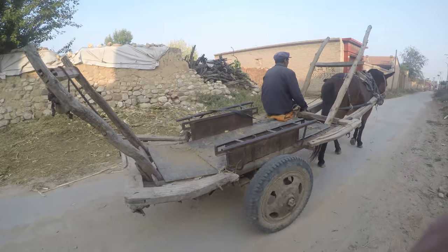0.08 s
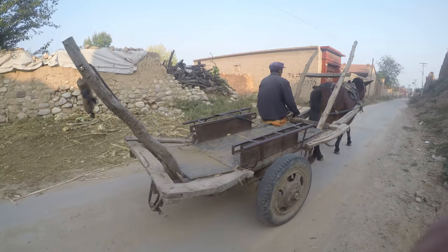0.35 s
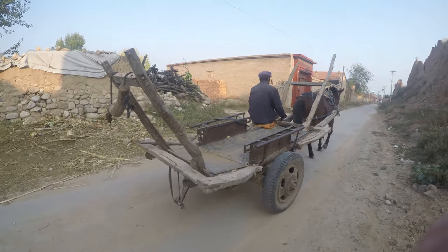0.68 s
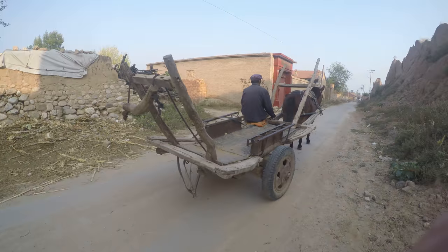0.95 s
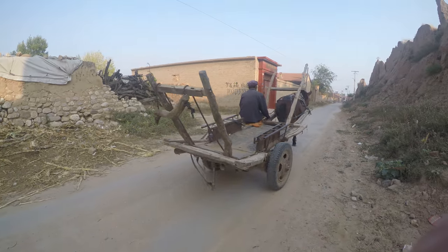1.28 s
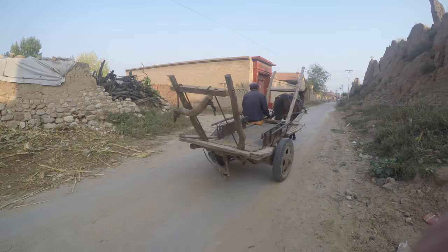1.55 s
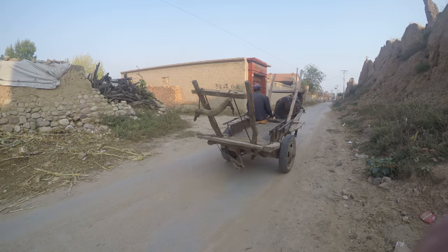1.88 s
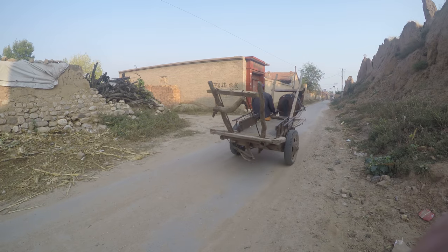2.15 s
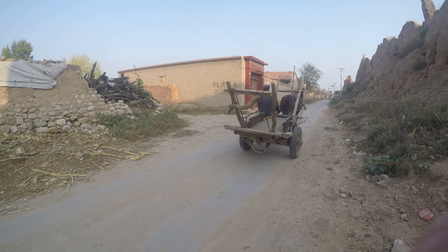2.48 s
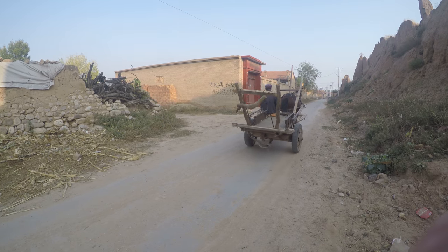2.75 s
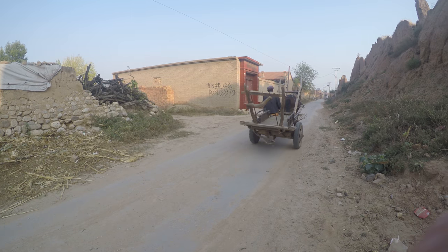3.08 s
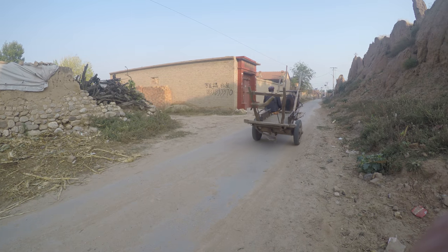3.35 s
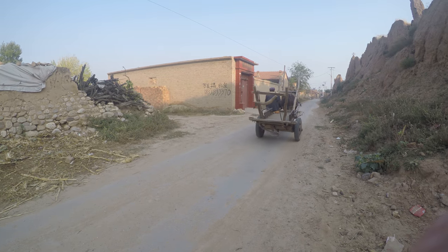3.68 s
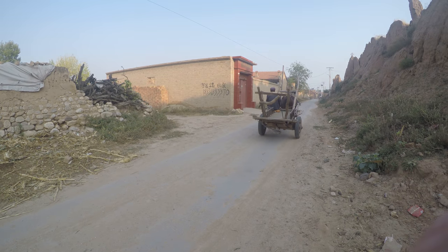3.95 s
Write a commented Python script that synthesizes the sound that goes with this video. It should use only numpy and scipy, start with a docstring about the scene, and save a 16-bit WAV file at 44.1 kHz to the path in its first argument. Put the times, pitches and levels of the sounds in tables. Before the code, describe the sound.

A horse-drawn wooden cart rattles away over a gritty road as sparrows chirp.

```python
"""A horse-drawn wooden cart moves away from the microphone down a dusty village road.
Its boards and fittings knock and ring, its frame groans as timber slips on timber,
the tyres crunch over grit and pebbles, and the hooves thud softly in the dust.
Sparrows chirp near and far, echoing between the walls. Behind them lie the village's hush
and a faint high whine; a light wind rumbles on the microphone."""
import sys
import numpy as np
from scipy import signal
from scipy.fft import rfft, irfft
from scipy.io import wavfile
from scipy.ndimage import uniform_filter1d

SR = 44100
rng = np.random.default_rng(int(sys.argv[2]) if len(sys.argv) > 2 else 0)


def pcm_store(signal):
    """Save signal as 16-bit PCM."""
    levels = np.round(np.clip(np.atleast_2d(signal), -1, 1) * 32767)
    wavfile.write(sys.argv[1], SR, levels.astype(np.int16).T)


N = 176400
T = np.arange(N) / SR

# knocks of boards and fittings: (time [s], relative level [dB], bass offset [dB], middle offset [dB],
# brightest pitch [Hz], crumble time [s])
KNOCKS = [(0.019,-40.5,-18,-9.5,3620,0.0025), (0.0476,-46.5,-7,-6,4660,0.007),
          (0.059,-42,-14,-6,4580,0.0023), (.120,-45.5,-34,-7.5,3630,0.0025),
          (0.149,-46,-11,-13,4680,0.0081), (.241,-43.5,-11,-10.5,4540,0.0075),
          (0.296,-45.5,-13,-28,5130,0.0093), (0.3459,-25.5,-41,-36,4350,0.00066),
          (0.3504,-31.5,-32,-15,4100,0.0011), (.637,-34.5,-13.5,-9.5,3300,0.0012),
          (.6467,-48,-2,-3,3300,0.0018), (0.8097,-44,-36,-13.5,3250,0.011),
          (0.996,-51.5,-22,-21,5000,0.013), (1.3368,-41.5,-13,-18,4600,0.0029),
          (1.480,-44,-7.5,-7.5,3600,0.0057), (1.669,-30.5,-8.5,-10.5,3500,0.0017),
          (1.6806,-34,-16,-9.5,4870,0.0023), (1.6839,-34.5,-10,-13,4400,0.001),
          (1.693,-45,-12,-17,3200,0.0029), (1.7816,-42,-21,-23,4300,0.0096),
          (1.8638,-45.5,-6,-11,3640,0.011), (2.6418,-54.5,-4,4,3550,0.0038),
          (2.776,-46.5,-25,-3.5,3380,0.0034), (3.041,-47.5,-16,-7.5,4400,0.0073),
          (3.2155,-51,-12,-2,4200,0.0058), (3.228,-51,-10,-3,3400,0.012), (3.5906,-44.5,-19,-8,3650,0.0028)]
# three groups of modes that a knock rings: (pitch [Hz], relative level [dB], t60 [s])
BASS_MODES = [(627, -6.5, 0.0081), (974, 4, 0.022), (1193, 2, 0.02), (1430, 2, 0.03)]
MIDDLE_MODES = [(2250, 0.41, 0.017), (2724, -1.5, 0.016)]
TREBLE_MODES = [(3300, 6, 0.012), (3750, 8, 0.004), (4200, 8.5, 0.0089), (4880, 8, 0.0055),
                (5120, 5.5, 0.011), (6290, 3.5, 0.0076)]
# snaps of grit and metal fittings: (time [s], relative level [dB])
SNAPS = [(.148, -48.5), (.297, -50), (0.3442, -37), (0.35, -42.5), (0.361, -54), (.81, -52), (1.48, -50.5),
         (1.67, -45), (1.682, -46)]
# groans of the frame: (time [s], length [s], centre pitch [Hz], level [dB], roughness [ratio])
CREAKS = [(0.161, .17, 311.2, -57, 0.89), (0.183, 0.118, 505.5, -69, 1.01),
          (0.348, 0.1004, 330.4, -59, 0.61), (0.714, 0.061, 351.7, -62, 0.6), (0.969, 0.058, 362, -58, 0.3)]
# tyres on grit, going away: (time [s], level [dB])
GRIT_LEVEL = [(0, -61.5), (.35, -61), (.7, -63.5), (1.1, -65.5), (2, -65.5), (3, -66.5), (4, -67)]
# spectrum of that grit: (frequency [Hz], relative level [dB])
GRIT_SPECTRUM = [(150, 6), (350, 4.5), (600, -1.5), (1100, -2), (1700, -9), (2400, -6.5), (4000, -6.5),
                 (6000, -8), (7500, -20.5), (15000, -40)]
# rumble of the cart's bed: (time [s], level [dB])
BED_LEVEL = [(0, -65.5), (.4, -66.5), (.8, -74.5), (4, -70.5)]
# pebbles pinched under the tyres: (time [s], peak before echoes [dB], pitch [Hz])
PEBBLES = [(.280, -50, 4110), (.3237, -42.5, 4120), (.366, -45, 4200), (.395, -58, 4000),
           (.4207, -44.5, 4200), (.5372, -49, 4230), (.563, -55, 4080), (.6125, -51, 2740),
           (.7427, -51, 4050), (.7751, -45.5, 4060), (.8824, -43, 3920), (1.095, -54.5, 5270),
           (1.222, -49.5, 3200), (1.278, -42.5, 3470), (1.575, -49, 4300), (1.627, -50, 3910),
           (1.758, -46, 3300), (2.073, -51.5, 3200), (2.215, -49, 4500), (3.674, -52, 3400)]
# hooves on packed earth: (time [s], peak before echoes [dB], pitch [Hz])
HOOVES = [(1.376, -55, 990), (1.585, -57, 1040), (1.932, -53, 1050), (2.473, -50.5, 1030),
          (2.558, -57.5, 950), (2.684, -55, 1100), (3.559, -55.5, 1070), (3.77, -56, 1200),
          (3.783, -52.5, 1070)]
# near sparrows: (time [s], length [s], start pitch [Hz], end pitch [Hz], relative level [dB])
CHIRPS = [(.455, 0.068, 5400, 3400, -55), (.655, 0.029, 4100, 5200, -54), (.72, 0.041, 5440, 3900, -52.5),
          (.825, 0.04, 5530, 3700, -53.5), (.875, 0.0282, 3700, 4200, -52), (.905, 0.04, 4200, 5300, -59),
          (1.235, 0.053, 6100, 4200, -53.5), (1.283, 0.021, 3900, 4030, -43.5),
          (1.41, 0.039, 4600, 4000, -56.5), (1.81, 0.055, 5000, 5950, -59),
          (1.89, 0.038, 3800, 3400, -54.5), (1.928, 0.063, 5500, 3300, -47),
          (1.992, 0.027, 3350, 3600, -50.5), (2.015, 0.021, 5700, 4200, -50),
          (2.135, 0.038, 4900, 4000, -59.5), (2.255, 0.067, 5300, 3200, -50.5),
          (2.33, 0.044, 5600, 3850, -51.5), (2.38, 0.033, 3950, 3750, -53.5),
          (2.425, 0.035, 4300, 3750, -58), (2.432, 0.02, 5200, 5900, -56.5),
          (2.465, 0.056, 5500, 3200, -53), (2.695, 0.024, 5500, 3700, -57.5),
          (2.845, 0.068, 3890, 4500, -60), (2.9, 0.038, 5000, 5900, -61), (3.02, 0.04, 4900, 3895, -54.5),
          (3.05, 0.047, 3850, 3135, -53), (3.32, 0.1, 5380, 3575, -57.5), (3.522, 0.062, 5900, 3750, -53)]
# swell of the farther flock: (time [s], gain [dB])
FLOCK_SWELL = [(0, 2.5), (1.3, -10), (1.9, 3), (2.4, 2.5), (2.7, -4), (4, -5)]
# peeps of a distant bird: (time [s], level [dB])
PEEPS = [(2.36, -65), (3.07, -70.5), (3.21, -64), (3.27, -72), (3.607, -68), (3.66, -64)]
# eddies striking the microphone: (time [s], level [dB], frequency [Hz])
BUFFETS = [(0.346, -34, 42), (0.504, -33.5, 55), (0.57, -32.5, 36), (.745, -41.5, 50), (.82, -38, 42),
           (0.927, -35, 45), (1.53, -39.5, 45), (1.68, -52, 42), (2.089, -36.5, 33), (2.522, -41.5, 45),
           (2.919, -32.5, 28)]
# wind on the microphone: (time [s], relative level [dB])
WIND_LEVEL = [(0, -47), (.6, -49), (1.2, -48.5), (2, -51.5), (2.5, -50.5), (3.1, -52), (4, -51.5)]
# spectra of the wind and of the village's far hush: (frequency [Hz], relative level [dB])
WIND_SPECTRUM = [(12, -1.5), (25, 1.5), (42, -2), (60, -7.5), (90, -11.5), (130, -25.5), (250, -34.5),
                 (600, -70)]
HUSH_SPECTRUM = [(70,-22), (120,-6.5), (446,-14), (818,-17.5), (1020,-16), (1440,-20.5), (2290,-16.5),
                 (3000,-16), (3800,-14.5), (4600,-21), (7860,-25), (13800,-30), (15000,-33)]

ROAD_ECHO_DB, ROAD_T60_S = -12, 0.29
BIRD_ECHO_DB, BIRD_T60_S = -3.5, 0.27


def knocks():
    """Each knock on the cart is a click and some crumbling grit, ringing three groups of modes."""
    click_db, focus_db_per_octave, pitch_scatter = -27, 17.5, 0.017
    out, t = np.zeros(N), T[:SR // 16]
    for s, db, bass_db, middle_db, bright_hz, crumble_s in KNOCKS:
        # longer contacts are grittier and less clicky
        grit = 58 * crumble_s * rng.standard_normal(len(t)) * np.exp(-t / crumble_s)
        contact = grit + (t == 0)
        knock = from_db(click_db) * contact / np.linalg.norm(contact)
        treble = [(hz, mode_db - focus_db_per_octave * abs(np.log2(hz / bright_hz)), t60)
                  for hz, mode_db, t60 in TREBLE_MODES]
        for modes, group_db in ((BASS_MODES, bass_db - 4), (MIDDLE_MODES, middle_db - 3), (treble, -5)):
            rings = np.zeros(len(t))
            for k, (hz, mode_db, t60) in enumerate(modes):
                pitch = hz * (1 + pitch_scatter * rng.normal())
                rings += (-1) ** k * from_db(mode_db) * ring(contact, pitch, t60)
            power = uniform_filter1d(rings ** 2, size=88, mode="constant")   # over 2 ms
            knock += from_db(group_db) * rings / np.sqrt(power.max())
        add(out, s, from_db(db) * knock)
    return out + from_db(ROAD_ECHO_DB) * walls(out, ROAD_T60_S)


def snaps():
    """Grit and metal fittings give very short, bright cracks with a thin ring."""
    decay_s = 0.0022
    out, t = np.zeros(N), T[:SR // 50]
    for s, db in SNAPS:
        add(out, s, from_db(db) * rng.standard_normal(len(t)) * np.exp(-t / decay_s) / 2)
    out = signal.sosfilt(signal.butter(2, [5000, 11100], "band", fs=SR, output="sos"), out + 1e-18)
    out += from_db(2) * resonance(out, hz=7200, width_hz=710)
    return out + from_db(ROAD_ECHO_DB) * walls(out, ROAD_T60_S)


def creaks():
    """Timber slips on timber in quick, uneven cycles; the pitch sags as the strain lets go."""
    sag, spread = .2, 0.246   # shares of the pitch
    out, jitter, flutter = np.zeros(N), drift(hz=69), drift(hz=69)
    for s, length, hz, db, rough in CREAKS:
        t = T[:int(length * SR)]
        here = int(s * SR) + np.arange(len(t))
        slip_hz = hz * (1 + sag * (.5 - t / length) + spread * rough * jitter[here])
        slips = np.sin(2 * np.pi * np.cumsum(slip_hz) / SR) * (1 + rough * flutter[here])
        add(out, s, from_db(db) * np.sin(np.pi * t / length) * rms_one(slips))
    return out


def tyres():
    """Grit cracks under the wheels and the cart's bed rumbles, loudest while the cart is near."""
    grains_per_s, spread_db = 1800, 4
    bed_hz, bed_width_hz = 119, 123
    grains = (rng.random(N) < grains_per_s / SR) * rng.choice([-1, 1], N)
    strength = from_db(spread_db * np.minimum(rng.exponential(1, N), 5))
    crunch = colour(grains * strength, GRIT_SPECTRUM)
    rumble = resonance(rng.standard_normal(N), bed_hz, bed_width_hz)
    rumble = resonance(rumble, bed_hz, bed_width_hz)
    return level(GRIT_LEVEL) * crunch + level(BED_LEVEL) * rms_one(rumble)


def pebbles():
    """Pebbles tick under the tyres; small ones come at random and fade with distance."""
    small_per_s, above_grit_db = 23, 10.5
    small = []
    for when, size, pitch in rng.random((int(small_per_s * N / SR), 3)):
        s = when * N / SR
        db = np.interp(s, *np.transpose(GRIT_LEVEL)) + above_grit_db + 6 * (size - .5)
        small.append((s, db, 2600 + 2800 * pitch))
    return crushes(PEBBLES + small, crush_s=0.0093, width_hz=1020)


def hooves():
    """Each hoof presses into the dust with a soft, hollow clop."""
    return crushes(HOOVES, crush_s=0.0065, width_hz=240)


def crushes(rows, crush_s, width_hz):
    """Under a tyre or hoof, a dying run of tiny contacts sounds one resonance; the walls answer."""
    out, t = np.zeros(N), T[:SR // 16]
    for s, db, hz in rows:
        contacts = rng.laplace(size=len(t)) * np.exp(-t / crush_s)
        crush = resonance(resonance(contacts, hz, width_hz), hz, 2 * width_hz)
        add(out, s, from_db(db) * crush / np.abs(crush).max())
    return out + from_db(ROAD_ECHO_DB) * walls(out, ROAD_T60_S)


def sparrows():
    """Near birds with their echoes, and a farther flock that reaches the microphone only as echoes."""
    flock_per_s, flock_db = 55, -67
    near = from_db(-0.5) * chirps(CHIRPS)
    near += from_db(BIRD_ECHO_DB) * walls(near, BIRD_T60_S)
    flock = [(when * N / SR, 0.02 + .04 * length, 4200 + 2400 * start, 3000 + 2600 * end, flock_db)
             for when, length, start, end in rng.random((int(flock_per_s * N / SR), 4))]
    return near + level(FLOCK_SWELL) * walls(chirps(flock), BIRD_T60_S)


def chirps(rows):
    """A sparrow whistles with two voices, in a glide that eases off, with a fast warble and rough edge."""
    warble_hz, warble_depth_hz, waver_depth_hz = 171.8, 160, 190
    second_ratio, second_db = 1.17, -11.5
    ease, roughness = 1.1, .7
    out, waver, flutter = np.zeros(N), drift(hz=218), drift(hz=130)
    for s, length, start_hz, end_hz, db in rows:
        t = T[:int(length * SR)]
        here = (int(s * SR) + np.arange(len(t))) % N
        glide = np.expm1(-ease * t / length) / np.expm1(-ease)
        warble = warble_depth_hz * np.sin(2 * np.pi * warble_hz * t)
        hz = start_hz + (end_hz - start_hz) * glide + warble + waver_depth_hz * waver[here]
        phase = 2 * np.pi * np.cumsum(hz) / SR
        voices = np.sin(phase) + from_db(second_db) * np.sin(second_ratio * phase)
        swell = np.sin(np.pi * t / length) * rms_one(1 + roughness * flutter[here])
        add(out, s, from_db(db) * swell * voices)
    return signal.sosfilt(signal.butter(6, 6300, fs=SR, output="sos"), out)


def distant_bird():
    """Thin, high whistles, each on one pitch, blurred by the walls."""
    centre_hz, length_s = 6400, 0.027
    out, t = np.zeros(N), T[:int(length_s * SR)]
    for s, db in PEEPS:
        hz = centre_hz * (1 + 0.0083 * rng.normal())
        add(out, s, from_db(db) * np.sin(np.pi * t / length_s) * np.sin(2 * np.pi * hz * t))
    return out + from_db(BIRD_ECHO_DB) * walls(out, BIRD_T60_S)


def buffets():
    """Each eddy pushes and pulls on the microphone for a cycle or two."""
    out, width_s = np.zeros(N), 0.017
    for s, db, hz in BUFFETS:
        swell = np.exp(-((T - s) / width_s) ** 2 / 2)
        out += from_db(db) * swell * np.sin(2 * np.pi * (hz * T + rng.random()))
    return out


def wind():
    """Light wind on the microphone: a deep rumble that wavers with the gusts."""
    gust_db = 2 + 2.5 * drift(hz=7)
    return from_db(gust_db) * level(WIND_LEVEL) * colour(rng.standard_normal(N), WIND_SPECTRUM)


def village():
    """The village's steady, far hush and a faint high whine."""
    hush = colour(rng.standard_normal(N), HUSH_SPECTRUM)
    whine = rms_one(resonance(rng.standard_normal(N), hz=14697, width_hz=38))
    return from_db(-64.5) * hush + from_db(-85.5) * whine


def walls(x, t60):
    """Roadside walls return scattered echoes, from 4 ms after the direct sound."""
    t = T[:SR // 2]
    echoes = rng.standard_normal(len(t)) * (rng.random(len(t)) < .03) * (t > .004)
    echoes *= np.exp(-np.log(1000) * t / t60)
    return signal.fftconvolve(x, echoes / np.linalg.norm(echoes))[:N]


def from_db(db):
    """Decibels to gain."""
    return 10 ** (np.asarray(db) / 20)


def rms_one(x):
    """Scale to rms 1."""
    return x / np.sqrt(np.mean(x ** 2) + 1e-20)


def level(rows):
    """Gain over time from (time [s], level [dB]) rows."""
    return from_db(np.interp(T, *np.transpose(rows)))


def add(out, s, x):
    """Mix x in at time s."""
    i = int(np.clip(s * SR, 0, N - 1))
    out[i:i + len(x)] += x[:N - i]


def colour(x, spectrum):
    """Shape by (frequency [Hz], level [dB]) rows and a 10 Hz low cut; rms 1."""
    hz, db = np.transpose(spectrum)
    f = np.maximum(np.arange(N // 2 + 1) * SR / N, 1)
    gain = from_db(np.interp(np.log(f), np.log(hz), db))
    return rms_one(irfft(rfft(x) * gain * f / np.hypot(f, 10), N))


def ring(x, hz, t60):
    """One mode: a unit click starts a dying sine of height 1."""
    r, w = np.exp(-np.log(1000) / (t60 * SR)), 2 * np.pi * hz / SR
    return signal.lfilter([0, np.sin(w)], [1, -2 * r * np.cos(w), r * r], x + 1e-18)


def resonance(x, hz, width_hz):
    """Band-pass with gain 1 at its peak."""
    r, w = np.exp(-np.pi * width_hz / SR), 2 * np.pi * hz / SR
    return signal.lfilter(np.array([1, 0, -1]) * (1 - r * r) / 2, [1, -2 * r * np.cos(w), r * r], x)


def drift(hz):
    """Random wander, smoothed above hz; rms 1."""
    return rms_one(signal.sosfilt(signal.butter(2, hz, fs=SR, output="sos"), rng.standard_normal(N)))


def scene():
    """The village road in mono, from one microphone that the cart leaves behind."""
    background = wind() + village() + buffets()
    horse_and_cart = tyres() + pebbles() + hooves() + creaks() + knocks() + snaps()
    return (horse_and_cart + sparrows() + distant_bird() + background)[None]


def record(dry):
    """The recorder cuts the top steeply."""
    cutoff_hz = 15300
    return signal.sosfilt(signal.ellip(12, .1, 70, cutoff_hz, fs=SR, output="sos"), dry)


dry = scene()
out = record(dry)
pcm_store(out)
```